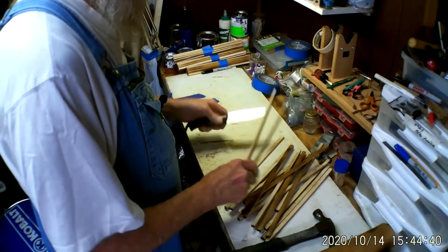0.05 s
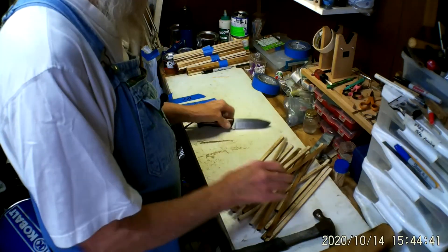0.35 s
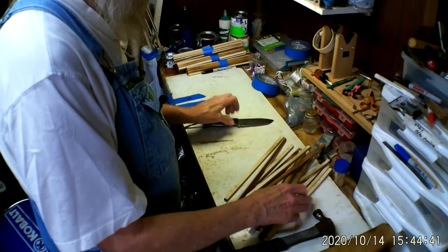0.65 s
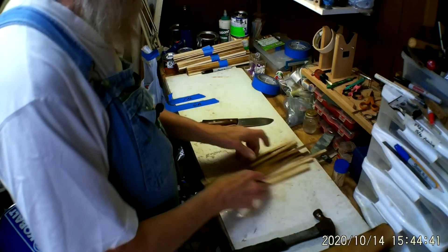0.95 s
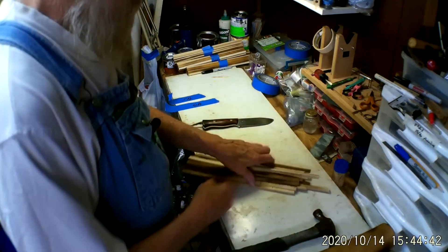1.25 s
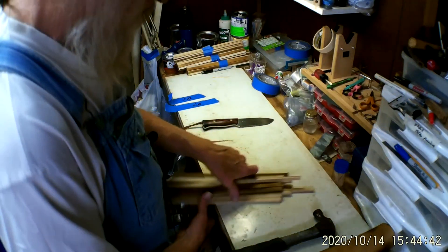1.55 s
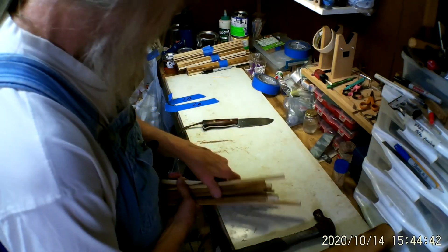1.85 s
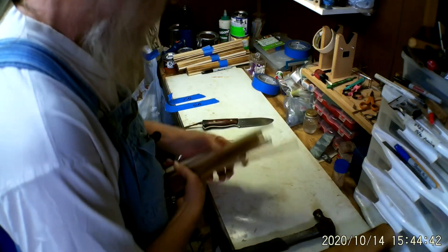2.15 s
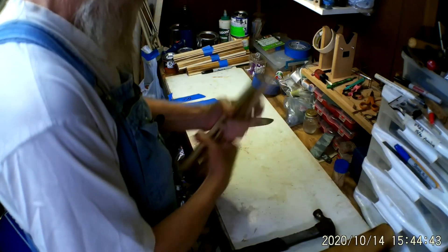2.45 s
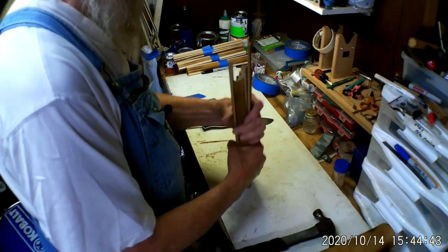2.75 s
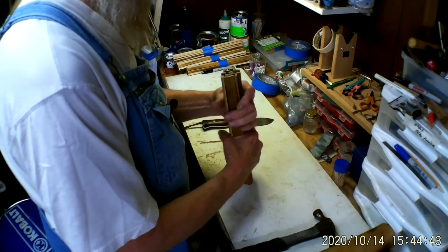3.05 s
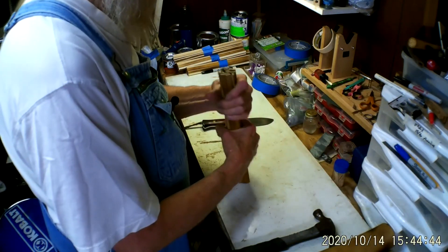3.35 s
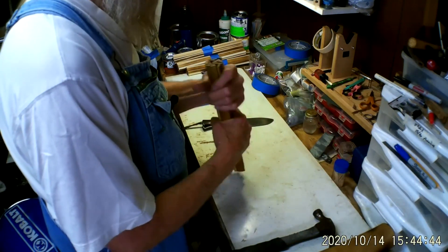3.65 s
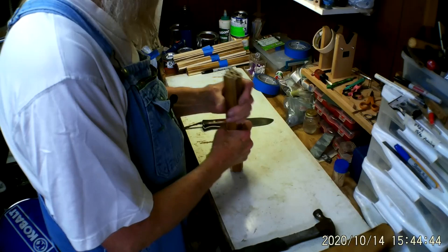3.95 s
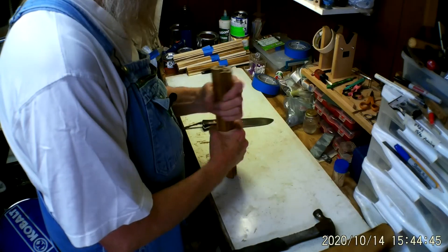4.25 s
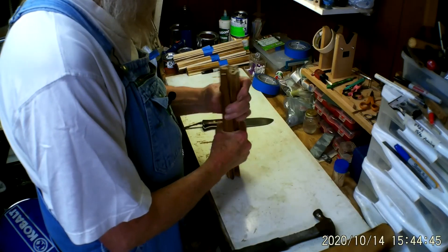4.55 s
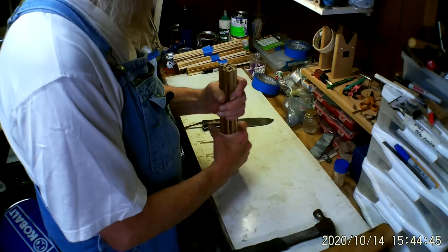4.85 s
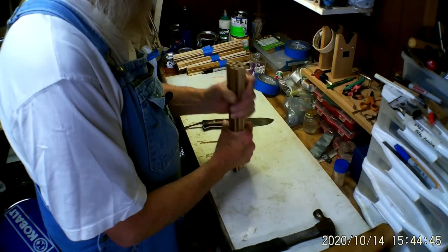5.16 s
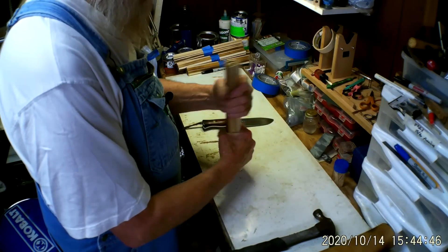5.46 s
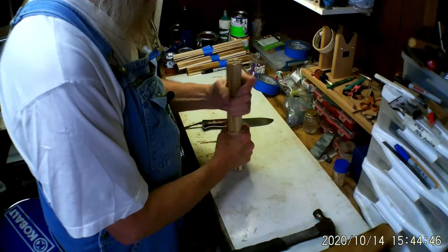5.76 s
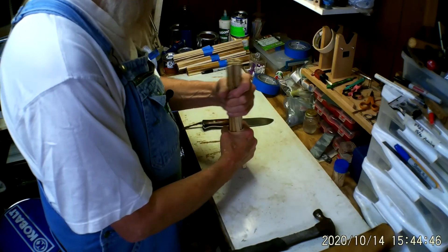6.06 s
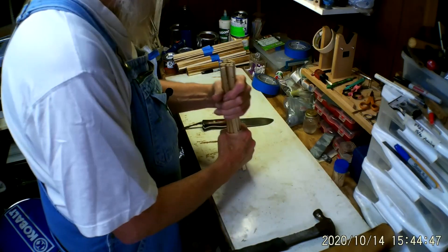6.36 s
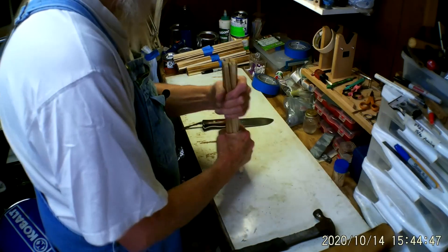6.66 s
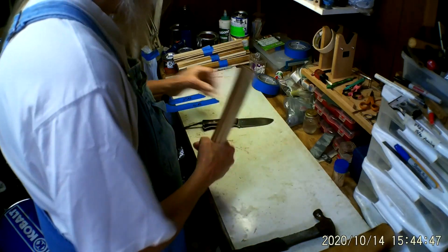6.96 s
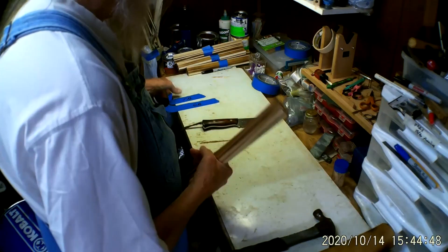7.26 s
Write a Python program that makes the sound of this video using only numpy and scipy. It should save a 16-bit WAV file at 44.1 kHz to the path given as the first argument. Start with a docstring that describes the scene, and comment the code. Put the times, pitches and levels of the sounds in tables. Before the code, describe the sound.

Split bamboo strips scrape and clatter together, then are tapped on end against a board in a small workshop.

```python
"""Light clicks and the chink of a knife laid down, then split bamboo strips swept over a work board.
The strips are gathered, lifted and tapped on end into a bundle. Sliding fibres catch and slip; strips
click together and ring as free bars, shorter in a tight grip; landings ring the board and thump the
bench. A small workshop reverberates over a faint rumble, and the microphone rounds the loudest peaks."""
import sys
import numpy as np
from scipy import signal
from scipy.fft import rfft, irfft, next_fast_len
from scipy.io import wavfile
from scipy.ndimage import map_coordinates

SR = 44100
rng = np.random.default_rng(int(sys.argv[2]) if len(sys.argv) > 2 else 0)


def file_out(sig):
    """Save sig as 16-bit WAV at sys.argv[1]."""
    # one column per channel
    cols = np.atleast_2d(sig).T
    # limit, then scale
    lim = np.clip(cols, -1, 1)
    pcm = np.round(lim * 32767).astype(np.int16)
    wavfile.write(sys.argv[1], SR, pcm)


N = 322371
N_FFT = next_fast_len(N + SR // 2)
TOP_HZ = 15900


def amp(db):
    """Decibels to gain."""
    return 10 ** (np.asarray(db) / 20)


def unit(x):
    """Scale to rms 1."""
    return x / np.sqrt(np.mean(x ** 2) + 1e-20)


def decay(t, t60_s):
    """Envelope falling 60 dB in t60_s."""
    return amp(-60 * t / t60_s)


def onset(t, tau_s):
    """Exponential rise to 1."""
    return 1 - np.exp(-t / tau_s)


def along(points, hz):
    """Interpolate (freq_hz, value) points on a log axis."""
    freq_hz, values = np.transpose(points)
    return np.interp(np.log(hz + 1), np.log(freq_hz + 1), values)


def wobble(rate_hz):
    """Smooth random curve, rate_hz knots a second."""
    knots = rng.standard_normal(int(N * rate_hz / SR) + 4)
    return map_coordinates(knots, [np.arange(N) * rate_hz / SR])


def coloured(x, spectrum):
    """Minimum-phase filter from (freq_hz, level_db) points."""
    gain = amp(along(spectrum, np.fft.rfftfreq(N_FFT, 1 / SR)))
    cepstrum = irfft(np.log(gain), N_FFT)
    cepstrum[1:N_FFT // 2] *= 2
    cepstrum[N_FFT // 2 + 1:] = 0
    return irfft(rfft(x, N_FFT) * np.exp(rfft(cepstrum)), N_FFT)[:N]


def bandpass(x, lo_hz, hi_hz, order=2):
    """Butterworth band-pass."""
    return signal.sosfilt(signal.butter(order, [lo_hz, hi_hz], 'band', fs=SR, output='sos'), x)


def band_noise(t, lo_hz, hi_hz):
    """Band of noise at rms 1."""
    return unit(bandpass(rng.standard_normal(len(t)), lo_hz, hi_hz))


def add(track, start_s, sound):
    """Mix a sound into the track."""
    i = max(round(start_s * SR), 0)
    track[i:i + len(sound)] += sound[:max(len(track) - i, 0)]


def struck(modes, t, scatter_db):
    """Damped modes, with new strengths and signs at each blow."""
    hz, level_db, t60_s = np.transpose(modes)
    gains = amp(level_db + scatter_db * rng.standard_normal(len(hz))) * rng.choice([-1, 1], len(hz))
    return gains @ (np.sin(2 * np.pi * hz[:, None] * t) * decay(t, t60_s[:, None]))


def thump(t, hz, t60_s):
    """Decaying octave of noise."""
    return band_noise(t, hz / np.sqrt(2), hz * np.sqrt(2)) * decay(t, t60_s)


# background spectrum: freq_hz, density_db
RUMBLE_SPECTRUM = [(20, 2), (60, -0.5), (120, -16.5), (250, -25), (1000, -33.5), (8000, -54)]

def rumble():
    """Faint, uneven low rumble."""
    level_db = np.interp(np.arange(N) / SR, [0, 0.4, 6.7, 7.05], [-74, -66.5, -68.5, -83])
    return amp(level_db + 2 * wobble(1.7)) * unit(coloured(rng.standard_normal(N), RUMBLE_SPECTRUM))


# room decay: freq_hz, t60_s
ROOM_DECAY = [(100, 0.93), (400, 0.24), (2000, 0.23), (6000, 0.26), (15000, 0.14)]

def workshop(x, early_db, tail_db):
    """Bench and shelf echoes plus a diffuse tail, redrawn every quarter second for the moving hands."""
    out, step = np.zeros(N), SR // 4
    for i in range(0, N, step):
        hz, t, noise = signal.stft(rng.standard_normal(SR // 2), SR, nperseg=256)
        _, tail = signal.istft(noise * decay(t, along(ROOM_DECAY, hz)[:, None]), SR, nperseg=256)
        tail *= onset(np.arange(len(tail)) / SR, 0.003)
        response = amp(tail_db) * tail / np.linalg.norm(tail)
        delays = (rng.uniform(0.0027, 0.016, size=8) * SR).astype(int)
        response[delays] += amp(early_db) * rng.choice([-1, 1], size=8)
        add(out, i / SR, signal.fftconvolve(x[i:i + step], response))
    return out


# short low thuds, some alone, most under loud clacks: start_s, level_db, pitch_hz
LOW_THUDS = [(0.525, -38.5, 200), (0.553, -35.5, 158.3), (1.345, -42, 282), (1.64, -35, 140),
             (2.97, -34.5, 150), (4.214, -33.5, 120.5), (5.175, -40, 134.6), (6.469, -37, 151.2)]

def thuds():
    """A low tone and a puff of noise die in a few cycles."""
    out, t = np.zeros(N), np.arange(SR // 2) / SR
    for start_s, level_db, hz in LOW_THUDS:
        tone = np.sin(2 * np.pi * hz * t) * decay(t, t60_s=0.03)
        add(out, start_s, amp(level_db) * (tone + thump(t, hz, t60_s=0.06)) * onset(t, 0.0013))
    return out


# blade before damping by the board: freq_hz, level_db, t60_s
BLADE_MODES = [(9150, -1, .08), (10890, -1.5, .12), (11120, 0.5, .17), (12750, -4, .17), (14460, -9, .07)]

def knife(start_s, gain_db):
    """The blade chinks and buzzes briefly on the board."""
    out, t = np.zeros(N), np.arange(SR // 4) / SR
    buzz = bandpass(band_noise(t, 9000, 14000), 9000, 13500, order=3)
    chink = 0.5 * struck(BLADE_MODES, t, scatter_db=2)
    add(out, start_s, amp(gain_db) * (buzz + chink) * onset(t, 0.00069) * decay(t, t60_s=0.036))
    return out


# pushes that slide the strips, and a few brief catches: start_s, length_s, start_db, end_db
PUSHES = [(0.314, 0.086, -35, -36), (0.62, 0.22, -61, -59), (0.793, 0.13, -43, -44.5),
          (0.958, .08, -39.5, -33), (1.079, .09, -38, -45.5), (1.244, 0.31, -50, -62.5),
          (1.51, 0.13, -63.5, -44.5), (1.603, .155, -44.5, -31.5), (1.88, 0.09, -48, -73.5),
          (2.144, 0.16, -57, -62.5), (2.334, 0.047, -40, -33), (2.469, 0.14, -40, -37),
          (2.794, 0.011, -46.5, -47), (2.881, .01, -34, -40), (3.121, 0.14, -45.5, -52),
          (3.449, 0.049, -57, -64.5), (3.673, .09, -69.5, -60), (3.797, 0.0034, -28.5, -34.5),
          (3.818, .14, -46, -48), (4.154, 0.039, -43, -36.5), (4.271, 0.1, -47, -39.5),
          (4.443, 0.32, -49.5, -55.5), (4.644, 0.17, -43.5, -38), (4.854, 0.047, -42.5, -40),
          (4.966, 0.051, -39.5, -45), (5.078, 0.076, -48, -49), (5.205, .12, -42, -40),
          (5.446, .13, -41.5, -33.5), (5.783, 0.16, -50.5, -44.5), (5.957, 0.005, -30.5, -44),
          (6.036, 0.1, -55.5, -74), (6.195, 0.053, -66, -57), (6.745, 0.024, -55.5, -71)]

def effort_db():
    """Each push rises fast, swells or eases, then releases."""
    rise_db_per_s, release_db_per_s = 802.5, 298.5
    t = np.arange(N) / SR
    level_db = np.full(N, -98.0)
    for start_s, length_s, start_db, end_db in PUSHES:
        end_s = start_s + length_s
        fade_db = rise_db_per_s * np.maximum(start_s - t, 0) + release_db_per_s * np.maximum(t - end_s, 0)
        level_db = np.maximum(level_db, np.interp(t, [start_s, end_s], [start_db, end_db]) - fade_db)
    return level_db


def chatter(slips_per_s, spread_db, t60_s, hiss):
    """Fibres catch and slip: tiny uneven scratches over a steady hiss."""
    when, draw = rng.random((int(slips_per_s * N / SR), 2)).T
    size = amp(spread_db * np.minimum(-np.log(1 - draw), np.e))
    slip_energy = np.bincount((when * N).astype(int), size ** 2, N)
    power = signal.lfilter([1], [1, -decay(1 / SR, t60_s) ** 2], slip_energy)
    return unit(np.sqrt(power / power.mean() + hiss ** 2) * rng.standard_normal(N))


# strips of one length: freq_hz, width_hz, level_db
BENDING_MODES = [(3460, 10, -6.5), (4780, 380, -2.5), (6340, 590, -2), (7580, 720, -1.5), (9300, 27, 0.5),
                 (10800, 83, 3.5), (12650, 280, 0.5)]

def through_strips(friction, ring):
    """Friction drives the bending modes; output at rms 1."""
    f = np.fft.rfftfreq(N_FFT, 1 / SR)
    resonance = sum(amp(db) * 1j * f * width_hz / (hz * hz - f * f + 1j * f * width_hz)
                    for hz, width_hz, db in BENDING_MODES)
    return unit(irfft(rfft(friction, N_FFT) * (1 + ring * resonance), N_FFT)[:N])


# friction on the board: freq_hz, density_db
DRAG_SPECTRUM = [(60, -11), (300, -9), (500, -3.5), (1000, -5), (2000, 0.5), (3200, -2), (4900, -4.5),
                 (7500, -8), (9000, -5), (13000, -11), (16000, -16)]
# friction in the held bundle: freq_hz, density_db
RUB_SPECTRUM = [(60, -21.5), (250, -11.5), (500, -3), (1200, -7.5), (2000, -5), (3200, -5.5), (4900, 0),
                (7700, -3.5), (9500, -5.5), (13000, -10), (16000, -23.5)]

def sliding():
    """Strips drag over the board, ringing freely, then rub damped in the lifted bundle."""
    push_db, usual_push_db = effort_db(), -41.5
    lifted = np.clip((np.arange(N) / SR - 1.85) / 0.32, 0, 1)
    drag = coloured(chatter(slips_per_s=980, spread_db=3.5, t60_s=0.012, hiss=0.49), DRAG_SPECTRUM)
    rub = coloured(chatter(slips_per_s=560, spread_db=7, t60_s=0.021, hiss=0.47), RUB_SPECTRUM)
    # rough edges catch less often and rasp more under a hard push
    rasp = bandpass(chatter(slips_per_s=240, spread_db=8.5, t60_s=0.02, hiss=0.35), 1550, 2550)
    rasp_db = -3.5 + np.maximum(push_db - usual_push_db, 0)
    in_hands = amp(2.5) * through_strips(rub, ring=0.9) + amp(rasp_db) * unit(rasp)
    in_hands *= amp(1.7 * wobble(45))
    on_board = amp(4.5 + 2 * wobble(40)) * through_strips(drag, ring=3.7)
    return amp(push_db) * ((1 - lifted) * on_board + lifted * in_hands)


def ticks(per_s, centre_hz, body_db, treble_db):
    """Edges slip past each other at random, louder under a harder push."""
    out, push_db = np.zeros(N), effort_db()
    for when, size, pitch in rng.random((int(per_s * N / SR), 3)):
        i = int(when * N)
        snap_db = push_db[i] + 3 + 3.5 * (2 * size - 1)
        hz = centre_hz * 2 ** (pitch - 0.5)
        add(out, i / SR, click(i / SR, snap_db, snap_db + body_db, snap_db + treble_db, hz))
    return out


# hold on the strips, 0 loose to 1 tight: time_s, grip
HAND_GRIP = [(0.4, 0.24), (1.75, 0.64), (2.2, 0.77), (2.65, 0.98), (2.8, .1), (3.55, 0), (3.8, 0.53),
             (4.2, 1), (6.8, 0.99)]

def grip_at(time_s):
    """Tightness of the hands."""
    return np.interp(time_s, *np.transpose(HAND_GRIP))


# strips lying loose: freq_hz, level_db, t60_s
LOOSE_STRIP_MODES = [(1340, -8.5, 0.2), (1670, -4.5, 0.32), (2900, -5.5, 0.14), (3110, -2.5, 0.28),
                     (3185, 1.5, .2), (4086, -1, 0.26), (4442, -0.5, .2), (4940, -3, 0.26), (5944, 3, .22),
                     (7045, -1.5, .2), (7736, -1, .2)]

def sympathetic_ring(gain_db):
    """Each clack rings the loose strips nearby; a tight grip stops them."""
    out, t = np.zeros(N), np.arange(SR // 3) / SR
    for start_s, snap_db, *_ in STRIP_HITS + LANDINGS:
        ring = struck(LOOSE_STRIP_MODES, t, scatter_db=6.5) * onset(t, 0.002)
        add(out, start_s, (1 - grip_at(start_s)) * amp(snap_db + gain_db) * ring)
    return out


# work board: freq_hz, level_db, t60_s
BOARD_MODES = [(324, -6.5, 0.074), (476, -6, 0.19), (650, -8.5, 0.18), (833, -4, 0.09), (956, -3, 0.057),
               (1050, -0.5, 0.057)]
# hollow ring of the bundle: freq_hz, level_db, t60_s
BUNDLE_MODES = [(981.4, -2, 0.08), (1130, -3, 0.1), (1405, -1.5, 0.066), (1745, 3.5, 0.07),
                (2210, 1.5, 0.095), (2302, -1.5, 0.21)]
# knocks on the board, the knife laid down, then the strips; relative levels: # start_s, snap_db, body_db,
# pitch_hz, treble_db, board_db, bench_db
LANDINGS = [(0.345, -10.5, -22.5, 5910, -8.5, -36, -58), (0.4166, -13.5, -26, 6000, -46.5, -32.5, -61.5),
            (0.5537, -9.5, -34, 6410, -37, -39, -66.5), (0.6625, -29, -49, 4535, -53, -55, -73),
            (1.6378, -2, -22.5, 4390, -37, -46, -53.5), (2.7991, -17.5, -28, 3390, -72, -32.5, -62),
            (2.9638, 1.5, -11, 5716, -12, -31, -51), (3.0806, -17.5, -22, 3217, -56, -41, -71),
            (3.5331, -11, -27.5, 4520, -43, -38, -68.5), (3.7794, 1, -23.5, 7150, -40, -24, -52.5),
            (3.8213, -5, -18.5, 4860, -25, -30, -43), (5.1739, -1.5, -15.5, 6610, -29.5, -31.5, -51.5),
            (6.2186, -36.5, -35.5, 2676, -63, -46.5, -56), (6.4708, -23.5, -32, 2800, -66, -39, -46.5)]

def knocks(board_gain_db, jostle_gain_db, bench_gain_db):
    """A landing rings the board, jostles the strips and thumps the bench."""
    out, t = np.zeros(N), np.arange(SR // 2) / SR
    for start_s, _, body_db, _, _, board_db, bench_db in LANDINGS:
        board = 1.1 * struck(BOARD_MODES, t, scatter_db=5.5)
        board += 0.6 * band_noise(t, 300, 1400) * decay(t, t60_s=0.28)
        jostle = 0.8 * band_noise(t, 1400, 1600) * decay(t, t60_s=0.19)
        jostle += 1.1 * struck(BUNDLE_MODES, t, scatter_db=0.5)
        knock = amp(board_db + board_gain_db) * board + amp(body_db + jostle_gain_db) * jostle
        knock += amp(bench_db + bench_gain_db) * thump(t, hz=70.5, t60_s=0.33)
        add(out, start_s, knock * onset(t, 0.0015))
    return out


def strip(t, hz, t60_s, neighbours_db, scatter_db):
    """A free bar rings at (2k + 1)^2 times a base pitch; the mode at hz is struck best."""
    series = (2 * np.arange(2, 15) + 1) ** 2
    best = np.argmin(np.abs(series * rng.uniform(15, 26) - hz))
    modes_hz = hz * series / series[best]
    level_db = neighbours_db + scatter_db * rng.standard_normal(len(series))
    level_db[best] = 0
    modes_t60_s = t60_s * (hz / modes_hz) ** 0.077
    phase = rng.uniform(0, 2 * np.pi, (len(series), 1))
    partials = np.sin(2 * np.pi * modes_hz[:, None] * t + phase) * decay(t, modes_t60_s[:, None])
    return (amp(level_db) * (modes_hz < TOP_HZ)) @ partials


def click(start_s, snap_db, body_db, treble_db, pitch_hz):
    """A buzzing contact rings two strips and the bundle for as long as the grip allows."""
    t = np.arange(SR // 8) / SR
    grip = grip_at(start_s)
    t60_s = np.interp(grip, [0, 1], [0.058, 0.018])
    partner_hz = np.interp(grip, [0, 1], [5560, 2455]) * np.exp(0.24 * rng.standard_normal())
    knots_s = t[::90]
    buzz = amp(4 * np.interp(t, knots_s, rng.standard_normal(len(knots_s))))
    contact = 1.25 * np.exp(-(t / 0.0016) ** 2) + 0.53 * buzz * decay(t, 2.4 * t60_s)
    scratch = contact * rng.standard_normal(len(t))
    first = strip(t, pitch_hz, 1.113 * t60_s, neighbours_db=-18.5, scatter_db=5.5)
    partner = strip(t, partner_hz, 1.113 * t60_s, neighbours_db=-12.5, scatter_db=7)
    bundle = struck(BUNDLE_MODES, t, scatter_db=4.5) * decay(t, 3 * t60_s)
    ring = min(pitch_hz / 4500, 1) * first + 0.63 * (partner_hz / 5500) ** 0.73 * partner + 0.23 * bundle
    ring *= np.interp(grip, [0, 1], [2.4, 1])
    bands = [(290, 900, 3, 0.36, body_db - 14.5),  # hands damp the low modes
             (900, 2500, 3, 0.97, body_db),
             (2500, 8500, 7, 0.55, snap_db),
             (9000, 13500, 3, 1.0, treble_db)]
    out, attack = np.zeros(len(t)), t < 0.005
    for lo_hz, hi_hz, order, ring_share, attack_db in bands:
        band = bandpass(onset(t, 0.0006) * (scratch + ring_share * ring), lo_hz, hi_hz, order)
        out += amp(attack_db) * band / np.std(band[attack])
    return out


# strip on strip, relative levels: start_s, snap_db, body_db, pitch_hz
STRIP_HITS = [(0.2719, -16, -36, 8080), (0.314, -8, -30.5, 7440), (0.3209, -8, -25.5, 7670),
              (0.3493, -5.5, -35.5, 5860), (0.8108, -11, -36.5, 4650), (0.8378, -13, -38.5, 4380),
              (0.9496, -15, -49.5, 4850), (0.9702, -12, -40, 4590), (0.9767, -13, -37, 6010),
              (0.9951, -10.5, -39.5, 4410), (1.0283, -4, -27, 3265), (1.0354, -0.5, -31.5, 4890),
              (1.1361, -18.5, -36, 5040), (1.2032, -13, -37, 5590), (1.216, -11, -29, 4630),
              (1.6938, -16, -34.5, 6130), (1.718, -12.5, -29.5, 2540), (1.7637, -1.5, -21, 4640),
              (1.7778, -10, -31.5, 5000), (1.7855, -8, -27, 7600), (2.1894, -26, -39, 4010),
              (2.416, -44, -56, 8200), (2.469, -13.5, -20.5, 2540), (2.481, -9.5, -21.5, 8040),
              (2.4883, -4, -21, 6400), (2.5404, -7, -24.5, 3840), (2.6147, -12, -34, 6140),
              (2.6548, -31.5, -38, 3360), (2.7814, -22, -34, 4410), (2.8916, -3, -19, 4096),
              (2.9687, -5, -25, 3280), (3.5988, -27, -41.5, 6480), (3.7845, -1.5, -18.5, 5810),
              (4.2102, -4, -18.5, 6150), (4.3068, -30, -38, 5350), (4.4017, -11.5, -27, 5010),
              (4.5796, -31, -42, 7300), (4.6502, -17, -34.5, 6520), (4.729, -20.5, -45, 6060),
              (4.7982, -20, -36.5, 7450), (4.8954, -22, -33, 4540), (4.997, -11, -26.5, 4900),
              (5.0216, -27, -37.5, 4340), (5.1395, -18, -43.5, 4330), (5.235, -16.5, -48, 6340),
              (5.2985, -16, -41, 6500), (5.437, -25.5, -30.5, 3920), (5.451, -20, -32, 4140),
              (5.464, -15, -36, 5180), (5.5883, -8.5, -22, 4200), (5.8214, -27, -44, 7370),
              (5.8707, -23, -37, 6000), (5.9289, -14.5, -29, 5400), (5.9584, -4, -13, 2460),
              (6.1679, -35.5, -48.5, 2670), (6.5226, -30.5, -51, 5350), (6.762, -24, -34.5, 4850)]

def clacks(snap_gain_db, body_gain_db):
    """Distinct hits of strip on strip, and of knife or strips on the board."""
    out = np.zeros(N)
    for start_s, snap_db, body_db, hz in STRIP_HITS:
        treble_db = snap_db + snap_gain_db - 22
        add(out, start_s, click(start_s, snap_db + snap_gain_db, body_db + body_gain_db, treble_db, hz))
    for start_s, snap_db, body_db, hz, treble_db, *_ in LANDINGS:
        clack = click(start_s, snap_db + snap_gain_db, body_db + body_gain_db, treble_db - 4, hz)
        add(out, start_s, clack)
    return out


def scene():
    """Bamboo, knife and board in the workshop, mono."""
    near = clacks(snap_gain_db=-11, body_gain_db=-4.5)
    near += ticks(per_s=14, centre_hz=5420, body_db=-12.5, treble_db=-7)
    near += knocks(board_gain_db=1, jostle_gain_db=-15, bench_gain_db=-1)
    near += thuds() + knife(start_s=0.35, gain_db=-17.5) + sliding()
    near += sympathetic_ring(gain_db=-37.5)
    return (near + workshop(near, early_db=-26.5, tail_db=-21.5) + rumble())[None]


def record(dry):
    """The microphone rounds off peaks and cuts above its band limit."""
    rounded = dry / (1 + dry ** 4) ** (1 / 4)
    lowpass = np.clip((TOP_HZ - np.fft.rfftfreq(N_FFT, 1 / SR)) / 300 + 0.5, 0, 1)
    return irfft(rfft(rounded, N_FFT) * lowpass, N_FFT)[..., :N]


dry = scene()
out = record(dry)
file_out(out)
```